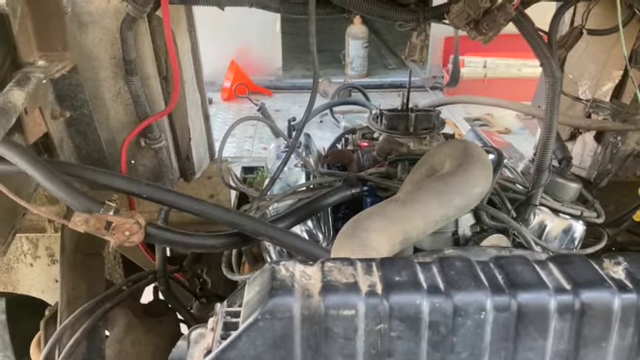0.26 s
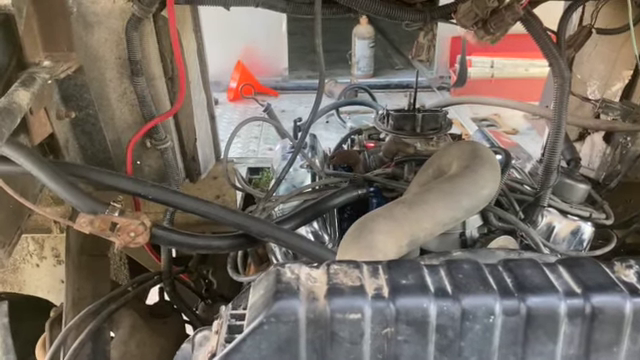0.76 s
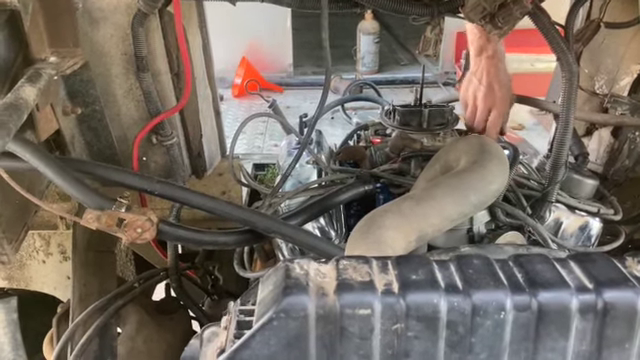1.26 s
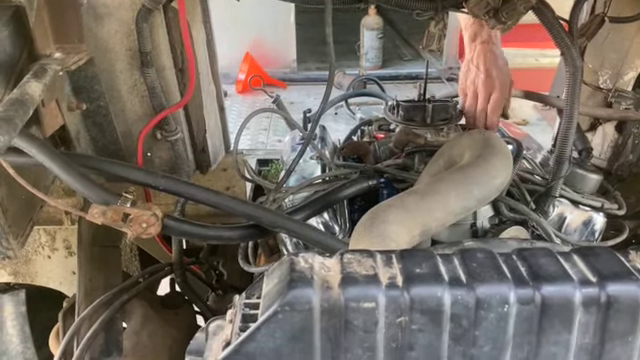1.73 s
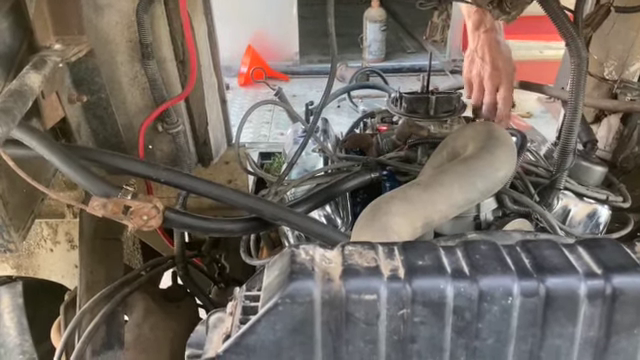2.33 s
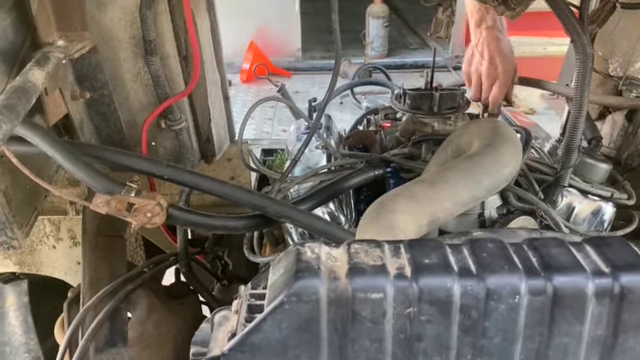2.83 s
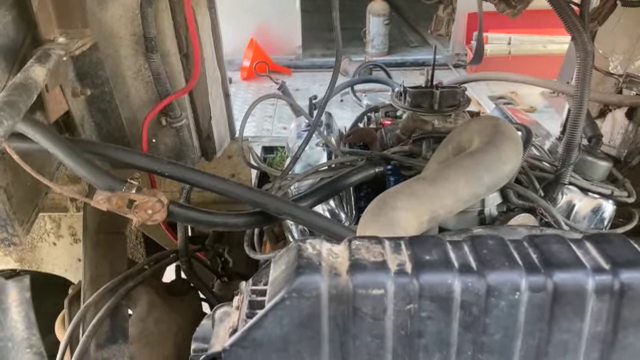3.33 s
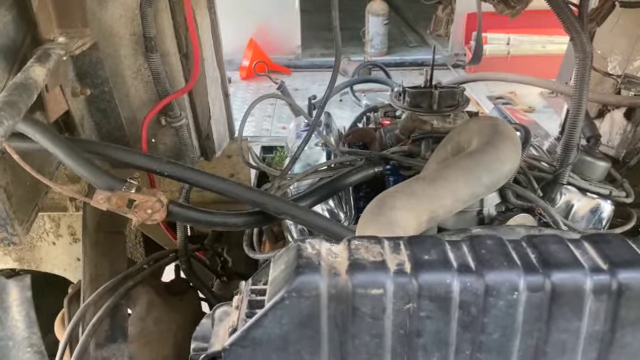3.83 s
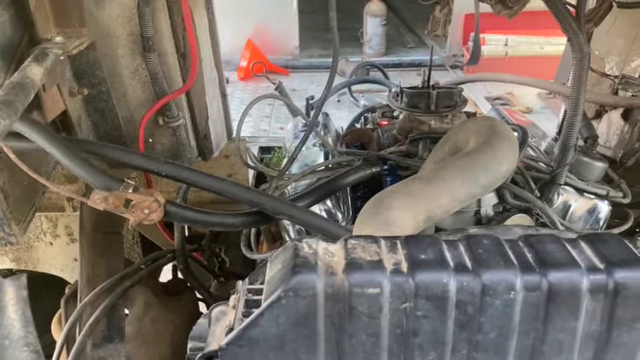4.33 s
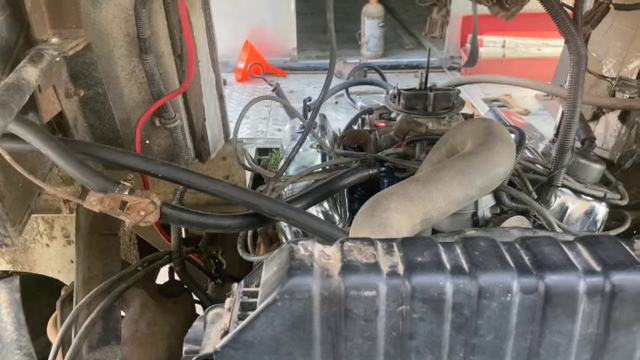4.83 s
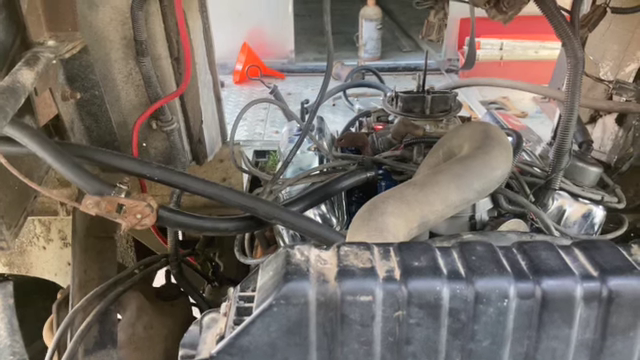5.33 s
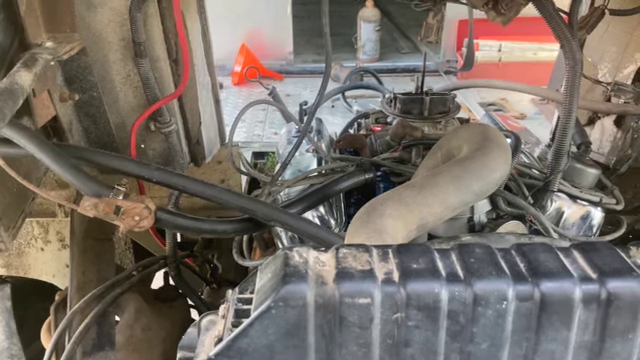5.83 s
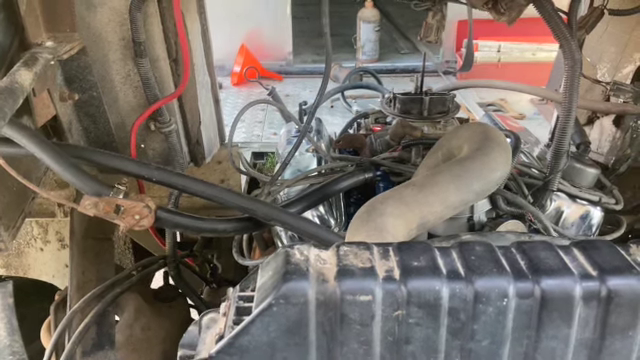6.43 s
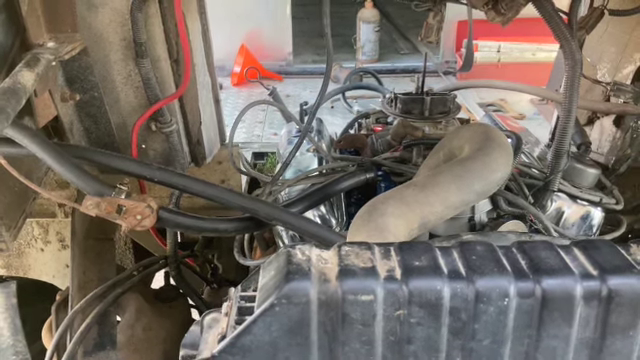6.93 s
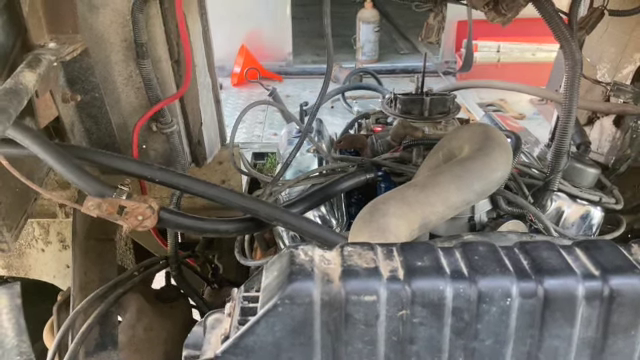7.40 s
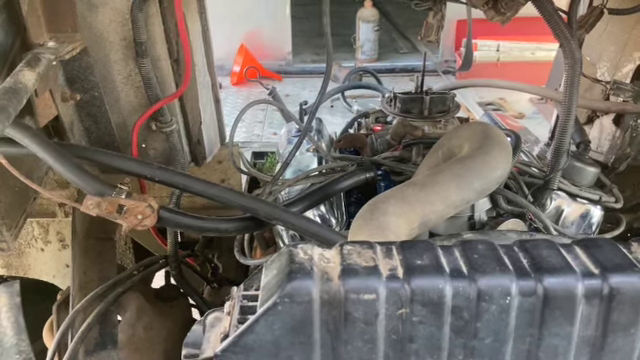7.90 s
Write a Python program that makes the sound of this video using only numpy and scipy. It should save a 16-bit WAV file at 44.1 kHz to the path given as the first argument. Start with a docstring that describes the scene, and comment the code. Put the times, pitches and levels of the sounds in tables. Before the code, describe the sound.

A faint, low, wavering rumble with a trace of hiss lies behind a workshop scene heard close above an open engine bay. Soft dull bumps come at 0.1, 0.65 and 1.1 seconds. A hand then works a metal linkage: light clicks from 1.45, with stronger double snaps and short scraping squeaks near 1.65, 2.35 and 2.93, and soft rubbing between. It is nearly quiet from 3.4. At 4.2 a starter slams in with a hard clack and labours in a gritty, uneven whine, with breathy coughs. At 4.9 the engine catches in a loud surge: boomy, lumpy exhaust, clattering block, droning panels, rushing intake and sharp irregular spits through the carburetor. The spits thin out as it weakens until about 7. At 7.25 it stalls, the firing slows and dulls, and loose ticks rattle unevenly, fading by 8.1. Wide stereo, short metallic echoes.

```python
"""An old carburetted engine heard from just above its open bay, in a workshop: firing pulses drive exhaust,
block and intake, through cranking, a lumpy run and a stall, while noise bursts spit through the carburettor.
Before that a hand bumps, clicks and scrapes at the linkage, as short bursts of filtered noise.
The starter slams in and whines in partials of its tooth pitch; something loose ticks as the engine runs down.
A low rumble lies behind; bay and hall echoes surround it all, picked up by a two-port microphone."""
import sys
import numpy as np
from scipy import signal
from scipy.fft import rfft, irfft
from scipy.io import wavfile
from scipy.ndimage import uniform_filter1d, map_coordinates

SR = 44100
rng = np.random.default_rng(int(sys.argv[2]) if len(sys.argv) > 2 else 0)


def master_out(mix):
    """Clip the mix to full scale and print it as 16-bit PCM to the path in sys.argv[1]."""
    frames = np.transpose(np.atleast_2d(mix))
    ceiling = np.clip(frames, -1, 1)
    pcm = np.round(ceiling * 32767).astype(np.int16)
    wavfile.write(sys.argv[1], SR, pcm)


N = 359856
TIME = np.arange(N) / SR  # s
HZ = np.fft.rfftfreq(2 * N, 1 / SR)

# Stages of the run [s]: the starter engages, the engine has caught, the fire goes out
CRANK_S, CATCH_S, STALL_S = 4.22, 4.92, 7.24
CRANKING_S = CATCH_S - CRANK_S
# Table levels stand ahead of the echoes and the microphone; colours and modes are relative.


def amp(db):
    """Decibels to gain."""
    return 10 ** (np.asarray(db) / 20)


def unit(x):
    """Scale to rms 1."""
    return x / np.sqrt(np.mean(x ** 2))


def curves(rows):
    """Each column of a table as a line through time."""
    s, *columns = np.transpose(rows)
    return [np.interp(TIME, s, c) for c in columns]


def since(s):
    """Seconds gone by since s; zero before."""
    return np.maximum(TIME - s, 0)


def ramp(s, length):
    """Rise from 0 to 1 over length seconds, starting at s."""
    return np.minimum(since(s) / length, 1)


def smooth(x, size):
    """Running mean, taken twice."""
    return uniform_filter1d(uniform_filter1d(x, size), size)


def walk(rate):
    """Smooth chance with a spread near 1, redrawn at this rate [Hz]."""
    k = int(SR / rate)
    return 1.3 * smooth(np.repeat(rng.standard_normal(N // k + 1), k), k)[:N]


def steady(x, seconds):
    """Hold the slow level at 1 and keep the quick pulsing."""
    power = np.abs(smooth(x ** 2, int(seconds * SR)))
    return x / np.sqrt(power + 1e-6)


def body(x, colour, modes=()):
    """Causal filter: a broad (Hz, dB) colour carrying (Hz, width Hz, dB) resonances; rms 1."""
    size = 16384
    bins = np.fft.rfftfreq(size, 1 / SR)
    hz, db = np.transpose(colour)
    # Folding the cepstrum gives minimum phase: no sound ahead of the blow
    cepstrum = irfft(np.log(amp(np.interp(np.log(bins + 1), np.log(hz), db))))
    response = np.exp(rfft(2 * cepstrum[:size // 2], size))
    ring = 1 + sum(amp(d) * 1j * bins * w / (f * f - bins * bins + 1j * bins * w) for f, w, d in modes)
    return unit(signal.oaconvolve(x, irfft(response * ring)[None], axes=-1)[:, :N])


def grit(spread_db):
    """Dense tiny impacts of unequal size, as both ports hear them: alike in the bass, apart in the treble."""
    sizes = amp(spread_db * np.minimum(rng.exponential(size=N), 5))
    mid, side = rng.standard_normal((2, N)) * sizes
    apart = signal.butter(1, 1290, "high", fs=SR, output="sos")  # Hz
    side = signal.sosfilt(apart, side)
    return unit(mid + 0.65 * side * np.array([[1], [-1]]))


def mottle(x, patchy_db, width_hz, seconds):
    """Let resonances come and go by chance, so that the colour keeps shifting."""
    hz, s, cells = signal.stft(x, SR, nperseg=512)
    chance = rng.standard_normal((300, 600))
    grid = np.meshgrid(hz / width_hz, s / seconds, indexing="ij")
    field = map_coordinates(chance, grid, order=1, mode="wrap")
    return unit(signal.istft(cells * amp(patchy_db * field), SR)[1][:, :N])


def swells(rows, hold):
    """Envelope of (s, dB, lead-in s, fade s) events that swell, hold for a moment and fade."""
    power = np.zeros(N)
    for s, db, lead, fade in rows:
        before = np.maximum(s - TIME, 0) / lead
        after = np.maximum(TIME - s - hold, 0) / fade
        power += amp(db) ** 2 * np.exp(-2 * np.minimum(before + after, 20))
    return np.sqrt(power)


def rasp(envelope, grain, colour, modes=()):
    """A grain that follows an envelope and rings one body."""
    return body(grain * envelope, colour, modes) * np.sqrt(np.mean(envelope ** 2))


def ringing(rows, lead, fade, hold, width_hz):
    """Brief, rough resonances of (s, dB, pitch Hz), each at a slightly wavering pitch of its own."""
    rows = sorted(rows)
    starts, _, pitches = np.transpose(rows)
    hz = pitches[np.searchsorted(starts[1:] - lead, TIME)]
    turn = 2 * np.pi * np.cumsum(hz * np.exp(.02 * walk(40))) / SR
    roughness = body(grit(0.33), [(width_hz, 0), (4 * width_hz, -24), (5000, -70)])
    return swells([(s, db, lead, fade) for s, db, _ in rows], hold) * roughness * np.sin(turn)


def workshop(x, bay_t60, hall_t60, bay_db, hall_db, scatter_hz):
    """Dense echoes off the bay's panels and a faint hall, even in colour; long waves are scattered little."""
    tails = 0
    for t60, db in [(bay_t60, bay_db), (hall_t60, hall_db)]:
        decay = amp(db - 60 * TIME / t60) * np.sqrt(2 * np.log(1000) / (t60 * SR))
        tails = tails + decay * rng.standard_normal((2, N))
    response = 1 + HZ / np.hypot(HZ, scatter_hz) * rfft(tails, 2 * N)
    tint = np.sqrt(smooth(np.abs(response) ** 2, 8000))
    return irfft(rfft(x, 2 * N) * response / tint)[:, :N]


def ambience():
    """A low, slowly wavering rumble with a trace of hiss; it swells over the first moments."""
    # Colour of the room at rest: (frequency [Hz], level [dB])
    shop_colour = [(20, -38), (45, -7.5), (80, 3), (140, -9.5), (225, -10.5), (340, -22), (650, -26),
                   (1200, -34), (1950, -27.5), (3000, -38), (9000, -45.5), (15500, -38.5)]
    rumble = body(grit(0.4), shop_colour, [(660, 36, 5.4)]) * amp(walk(5.7))
    return rumble * amp(-70.25 + 6.5 * ramp(0, 1.37))  # dB, swell over 1.37 s


def loose_part():
    """Once the fire is out something loose ticks unevenly and rustles, weakening overall."""
    # Ticks: (time [s], level before trim [dB])
    tick_rows = [(7.3158, -45), (7.3846, -60), (7.432, -42.5), (7.474, -44), (7.5063, -50), (7.579, -46),
                 (7.6555, -47), (7.7236, -47.5), (7.782, -47.5), (7.834, -52.5), (7.885, -51),
                 (7.9319, -56), (7.9758, -56), (8.0152, -54), (8.0576, -55), (8.1244, -58.5)]
    # Colour of the part: (frequency [Hz], level [dB])
    tick_colour = [(600, -5), (1100, 4.5), (1450, 13), (1800, 8.5), (2300, -2.5), (3400, -7), (5000, -29),
                   (12000, -23.5)]
    tick_trim_db, rustle_trim_db, rustle_s = -0.5, -15.5, 0.064
    ticks = [(s, db + tick_trim_db, 0.001, 0.0075) for s, db in tick_rows]
    # The part keeps shivering between its ticks
    rustle = [(s, db + rustle_trim_db, rustle_s, rustle_s) for s, db in tick_rows]
    return rasp(swells(ticks + rustle, hold=0.0015), grit(3.2), tick_colour)


def handling():
    """Soft bumps, then scrapes and snaps of the linkage, with fingers rubbing in between."""
    # Dull bumps: (time [s], level before trim [dB], lead-in [s])
    bump_rows = [(0.057, -37.5, 0.0014), (0.087, -42.5, 0.03), (0.6523, -41, 0.00056), (1.088, -47, 0.0062),
                 (1.11, -44.5, 0.0053), (1.322, -53.5, 0.018)]
    # Linkage clicks: (time [s], level before trim [dB], lead-in [s],
    # hard snap before trim [dB], ring of the casting [dB])
    click_rows = [(1.447, -30.5, 0.00044, -31, -61), (1.621, -35.5, 0.0011, -53, -62),
                  (1.644, -20.5, 0.0034, -21.5, -42.5), (1.669, -25.5, .0023, -26.5, -42),
                  (2.124, -34.5, .0005, -30.5, -58), (2.251, -54, 0.00055, -43.5, -70),
                  (2.302, -44, .0023, -45.5, -55), (2.348, -24, .001, -20.5, -41.5),
                  (2.588, -46.5, .0004, -71, -54.5), (2.729, -34, .00034, -32, -68),
                  (2.914, -32.5, .001, -38, -57), (2.928, -18.5, 0.0031, -16.5, -38.5),
                  (2.955, -27, .0044, -28.5, -39.5), (3.407, -57, .0019, -78, -73)]
    # Squeaks as the lever slides: (time [s], level [dB], pitch [Hz])
    scrape_rows = [(1.619, -48, 1910), (1.646, -34.5, 1316), (2.308, -51, 2085), (2.334, -46, 1450),
                   (2.912, -44, 2246), (2.922, -34.5, 1366)]
    # Soft rubbing and movement: (time [s], level [dB], lead-in [s], fade [s])
    rub_rows = [(1.2, -69.5, .06, 0.12), (1.42, -61, 0.037, 0.033), (1.68, -55.5, 0.091, .1),
                (2.17, -66.5, 0.08, 0.05), (2.36, -54, 0.063, 0.06), (2.69, -60.5, 0.077, 0.11),
                (2.95, -52.5, 0.049, 0.078), (3.81, -70.5, 0.0089, 0.035), (4.11, -66.5, 0.074, .05)]
    # Colours of bump, click, snap and rub: (frequency [Hz], level [dB])
    bump_colour = [(60, -16), (110, -2), (170, 2), (330, -8.5), (620, 2), (1200, -15.5), (3200, -21),
                   (4000, -35), (8300, -44), (11000, -59)]
    click_colour = [(120, -4), (250, -1), (420, -13.5), (1000, 2), (1500, 5), (2800, -2), (4300, 4),
                    (6000, -8), (8000, 1.5), (11300, 0.5), (15500, -20)]
    snap_colour = [(300, -19.5), (1400, -14), (5500, -7.5), (8200, 2), (15000, -6)]
    rub_colour = [(100, -11), (230, 13), (380, -9), (650, -8.5), (950, -2.5), (2000, -7.5), (3000, -14),
                  (8000, -16.5), (15000, -30.5)]
    # Resonances of linkage and casting: (frequency [Hz], width [Hz], level [dB])
    click_modes = [(1320, 61, 2), (2065, 100, 3)]
    casting_modes = [(530, 17, 9), (642, 48, 16)]

    bump_shape = swells([(s, db, lead, 0.014) for s, db, lead in bump_rows], hold=0.0033)
    bumps = rasp(bump_shape, grit(1.0), bump_colour)

    friction = mottle(grit(1.88), patchy_db=3.0, width_hz=320, seconds=0.1)
    click_shape = swells([(s, db, lead, 0.018) for s, db, lead, *_ in click_rows], hold=0.0039)
    clicks = rasp(click_shape, friction, click_colour, click_modes)
    snap_shape = swells([(s, db, .001, .002) for s, _, _, db, _ in click_rows], hold=0.0012)
    snaps = rasp(snap_shape, grit(0.83), snap_colour)

    casting_colour = [(60, -8), (200, -4.5), (700, 4.5), (1800, -28.5)]
    casting = steady(body(grit(.5), casting_colour, casting_modes), seconds=.02)
    casting = casting * swells([(s, db, lead, .024) for s, _, lead, _, db in click_rows], hold=0.0045)

    scrapes = ringing(scrape_rows, lead=.003, fade=0.014, hold=0.0075, width_hz=97)
    rub_shape = swells(rub_rows, hold=0.014) * amp(1.8 * walk(29.53))
    rub = rasp(rub_shape, friction, rub_colour, casting_modes)
    return amp(-4.5) * bumps + amp(-11.5) * clicks + amp(-3.5) * snaps + casting + scrapes + rub


def starter():
    """The solenoid snaps, the pinion slams home and its teeth whine, sagging at each compression."""
    # Labouring whine: (time [s], mesh pitch [Hz], second partial [dB], upper partials [dB])
    starter_rows = [(4.24, 270, -25.5, -36), (4.285, 288.2, -40, -45), (4.325, 319.5, -30.5, -27.5),
                    (4.39, 315.3, -31, -34.5), (4.47, 294, -32, -33), (4.52, 322.4, -23.5, -25),
                    (4.565, 282, -30, -32.5), (4.6, 278.5, -33, -39), (4.68, 315, -37, -28.5),
                    (4.712, 311, -38, -35.5), (4.76, 308.5, -42, -21), (4.8, 270, -29.5, -35),
                    (4.85, 258.7, -49.5, -48.5)]
    # Upper partials of the whine: (multiple of mesh pitch [-], level [dB])
    mesh_partials = [(3, 0), (4, -8), (5, -10), (7, -15.5), (8, -15)]
    # Solenoid snaps, pinion into ring gear: (time [s], level [dB], lead-in [s], fade [s])
    slam_rows = [(4.1725, -10, 0.00014, 0.0032), (4.198, -8.5, 0.0074, 0.013), (4.209, -10, 0.0034, 0.005)]
    # Colour of the slam: (frequency [Hz], level [dB])
    slam_colour = [(70, -35), (130, -8.5), (300, -4), (500, 3.5), (900, -6), (1500, 0), (2100, 0),
                   (2700, -9), (3500, -7.5), (5500, -8), (8200, -9.5), (12000, -17.5), (15800, -25)]
    # Ring of the solenoid: (time [s], level [dB], pitch [Hz])
    solenoid_ring = (4.173, -9, 3400)
    pinion_teeth, wobble_db = 9, 2.5
    release_s, release_db_s = 4.83, 196  # the pinion drops out
    spin_up_s = 0.016

    hz, low_db, high_db = curves(starter_rows)
    turn = 2 * np.pi * np.cumsum(hz * (1 + .009 * walk(170))) / SR
    upper = unit(sum(amp(d + 2.5 * walk(40)) * np.sin(k * turn) for k, d in mesh_partials))
    whine = amp(low_db) * unit(np.sin(2 * turn)) + amp(high_db) * upper
    # The teeth bite unevenly, in step with each pinion turn and by chance
    whine = whine * amp(wobble_db * (np.sin(turn / pinion_teeth) + walk(60)))
    whine = whine * amp(-release_db_s * since(release_s)) * ramp(CRANK_S, spin_up_s)
    slam = rasp(swells(slam_rows, hold=0.0013), grit(0.42), slam_colour)
    ping = ringing([solenoid_ring], lead=0.00027, fade=0.0028, hold=0.00074, width_hz=84)
    return whine + slam + ping


def misfires():
    """The carburettor coughs, then spits back; each spit rings its throat at a pitch of its own."""
    # First coughs of mixture while cranking: (time [s], level [dB])
    cough_rows = [(4.65, -21.5), (4.736, -24.5), (4.838, -22)]
    # Spits through the carburettor: (time before lag [s], level before trim [dB],
    # throat pitch [Hz], throat ring [dB], extra treble [dB])
    spit_rows = [(4.942, -10, 2500, -16.5, -4), (5.031, -8, 2636, -20, 0), (5.0729, -8, 2500, -29, 0),
                 (5.1467, -5, 2694, -20, 0.5), (5.222, -17, 2310, -25.5, -10),
                 (5.2444, -25.5, 2530, -38, 6.5), (5.288, -15.5, 2977, -32, -15),
                 (5.322, -10.5, 2605, -22, -3.5), (5.3627, -15, 2615, -30, -5),
                 (5.433, -8.5, 2540, -35, -3.5), (5.502, -20.5, 2304, -29, 1.5), (5.579, -21, 2412, -34, 3),
                 (5.6211, -20.5, 2765, -27, 5.5), (5.67, -15.5, 2280, -43, 1), (5.727, -19, 4390, -32, -2),
                 (5.767, -7.5, 2760, -24, -4), (5.812, -22.5, 2008, -22.5, -1.5),
                 (5.853, -15, 2500, -21.5, -2.5), (5.9434, -19.5, 2385, -19, -1),
                 (5.996, -9, 2830, -40, -3), (6.0551, -15.5, 2350, -24.5, -1),
                 (6.1205, -21, 4470, -35, -6.5), (6.173, -12, 2700, -16.5, 3),
                 (6.2244, -25, 2012, -31, 0.5), (6.2695, -12.5, 2282, -24, -6),
                 (6.3914, -29, 3040, -36.5, 3.5), (6.459, -13, 2483, -24, -1),
                 (6.551, -12.5, 2600, -42, -1.5), (6.7733, -12.5, 2500, -23, -3),
                 (6.8394, -20.5, 2410, -40, -2.5), (6.9032, -21, 2226, -29, 3),
                 (6.9885, -17, 2524, -26.5, -1.5)]
    # Colour of the jet: (frequency [Hz], level [dB])
    spit_colour = [(500, -14.5), (1500, -2.5), (2500, 1), (3500, 0.5), (4400, 2.5), (6500, -0.5),
                   (8500, 0.5), (12000, 0.5), (15500, -3.5)]
    lead, fade = 0.0054, 0.012  # s
    gas = mottle(grit(4.2), patchy_db=2.5, width_hz=702, seconds=0.02)

    cough_shape = swells([(s, db, .019, 0.033) for s, db in cough_rows], hold=0.0051)
    cough_colour = [(900, -22.5), (2400, 4.5), (4300, -0.5), (6500, -12.0), (8500, -13.5), (15000, -26.0)]
    coughs = rasp(cough_shape, gas, cough_colour)

    blast = swells([(s + 0.0028, db, lead, fade) for s, db, *_ in spit_rows], hold=0.0053)
    sizzle_rows = [(s + 0.0013, db + bright, lead, fade) for s, db, _, _, bright in spit_rows]
    sizzle = swells(sizzle_rows, hold=0.0019)
    jet = body(gas, spit_colour)
    low = signal.sosfiltfilt(signal.butter(2, 5490, fs=SR, output="sos"), jet)  # the sizzle lies above
    spits = amp(-4.5) * (blast * low + sizzle * (jet - low))

    throat_rows = [(s + 0.002, ring, hz) for s, _, hz, ring, _ in spit_rows]
    throat = ringing(throat_rows, lead=0.0026, fade=0.012, hold=0.0082, width_hz=125)
    return coughs + spits + throat


def flare():
    """The surge on catching: 1 until then, soon spent."""
    return np.exp(-(since(CATCH_S) / .3) ** 2)


def stages(first_db, last_db, firing_db, flare_db, starve_db_s, out_s, drop_db, coast_db_s):
    """Gain that builds while cranking, flares on catching, sinks as fuel runs short and drops as the engine dies."""
    rise_s, die_s = 0.13, 0.29
    cranking = first_db + (last_db - first_db) * ramp(CRANK_S, CRANKING_S)
    firing = firing_db + flare_db * flare() - starve_db_s * (since(CATCH_S) - since(out_s))
    caught = ramp(CATCH_S - rise_s, rise_s)
    dying = drop_db * ramp(out_s, die_s) + coast_db_s * since(out_s)
    return amp(cranking + caught * (firing - cranking) - dying)


def speed():
    """Firings a second: the crank gathers pace, overshoots, holds and coasts down."""
    crank_hz, running_hz, flare_hz = 26.87, 55.2, 6
    coast_hz_per_s = 23
    gain_hz = running_hz + flare_hz * flare() - crank_hz
    return crank_hz + ramp(CRANK_S, CRANKING_S) * gain_hz - coast_hz_per_s * since(STALL_S)


def firings(jitter, scatter_db):
    """Uneven cylinder pulses, and the share of each firing period gone by."""
    # Strength in firing order, one column: (level [dB])
    cylinder_db = [-4.5, -5, -3, -7.5, -2.5, -14, -6, -2.5]
    count = np.cumsum(speed() * np.exp(jitter * walk(70))) / SR
    at = np.flatnonzero(np.diff(np.floor(count)))
    pulses = np.zeros(N)
    pulses[at] = amp(np.resize(cylinder_db, len(at)) + scatter_db * rng.standard_normal(len(at)))
    return pulses, count % 1


def tappets(pulses):
    """The valve gear gives a small hard tick with each firing."""
    # Colour of the ticks: (frequency [Hz], level [dB])
    tappet_colour = [(900, -23.5), (2000, -3), (3200, -4), (4800, -5.5), (7000, -4), (15000, -14.5)]
    # Resonances of the valve gear: (frequency [Hz], width [Hz], level [dB])
    tappet_modes = [(2530, 59, 6.97), (3347, 63, 13)]
    fade_s = 0.0023
    envelope = signal.lfilter([1], [1, -np.exp(-1 / (fade_s * SR))], pulses + 1e-9)
    return body(grit(2.3) * envelope, tappet_colour, tappet_modes) * amp(-6)


def exhaust(gas):
    """Pulses of gas boom and bark in the pipe, whose own note joins the boom as they weaken."""
    # Exhaust: (time [s], boom before trim [dB], bark before trim [dB])
    exhaust_rows = [(4.24, -32, -29), (4.36, -32, -40), (4.45, -35.5, -33), (4.88, -35.5, -43),
                    (4.98, -18, -29.5), (5.2, -25.5, -30.5), (5.31, -21.5, -30), (5.59, -28.5, -34.5),
                    (5.65, -22, -32.5), (5.93, -27, -33), (6.08, -20.5, -28), (6.81, -22, -29.5),
                    (6.91, -27.5, -29), (6.96, -19, -32.5), (7.35, -23, -29), (7.46, -29, -39.5),
                    (7.53, -28, -41.5), (7.78, -39.5, -52), (8.15, -51, -58.5)]
    # Colours of boom and bark: (frequency [Hz], level [dB])
    boom_colour = [(18, -38.5), (35, -9.5), (50, -19.5), (70, -4), (110, -7), (145, -3.5), (180, -10),
                   (300, -26.5), (900, -70.5), (4000, -110)]
    bark_colour = [(60, -22.5), (130, -8.5), (200, 6.5), (245, 0.5), (290, -2.5), (340, -7), (400, -6),
                   (470, -15.5), (650, -17), (950, -33.5), (3000, -58), (9000, -100)]
    # Resonances of the pipe: (frequency [Hz], width [Hz], level [dB])
    pipe_modes = [(76.5, 13, -1), (99, 23, -4.5), (131.4, 5.5, 4)]
    boom_trim_db, bark_trim_db = 0.03, 0.9
    lump_db, lump_hz = 3, 18  # the exhaust chugs unevenly

    boom_db, bark_db = curves(exhaust_rows)
    hz, width, _ = pipe_modes[-1]
    note = unit(signal.lfilter(*signal.iirpeak(hz, hz / width, fs=SR), gas))
    boom = body(gas, boom_colour, pipe_modes) + amp(-7) * ramp(6.71, 0.3) * note
    boom = steady(boom, seconds=.1) * amp(boom_trim_db + boom_db)
    bark = steady(body(gas, bark_colour), seconds=.057) * amp(bark_trim_db + bark_db)
    return (boom + bark) * amp(lump_db * walk(lump_hz))


def soften(x):
    """As the engine dies, the clatter loses its hard edge."""
    dull = signal.sosfiltfilt(signal.butter(1, 2150, fs=SR, output="sos"), x)
    return dull + (x - dull) * amp(-53.5 * ramp(7.265, 0.093))


def block(shake):
    """The shaken block clatters, its panels drone at wavering pitches, and heavy knocks ring out."""
    # Heavy knocks: (time [s], level [dB], lead-in [s], ring [dB], ring pitch [Hz])
    knock_rows = [(4.685, -24.5, .03, -19, 522), (4.955, -16, .01, -34, 640.4),
                  (5.1, -19.5, 0.11, -20, 991), (5.23, -31, 0.0046, -22, 660),
                  (5.675, -24.5, .003, -25, 608), (6.27, -31.5, 0.08, -33, 620),
                  (6.93, -31, 0.039, -39, 562.3)]
    # Clatter through the stages: (first turn [dB], last turn [dB], firing [dB], flare [dB],
    # starving [dB/s], gives out [s], drop [dB], coasting [dB/s])
    clatter_level = (-33.5, -23.5, -26, -1.5, 8, 7.5, 17, 1)
    # Colour of the block: (frequency [Hz], level [dB])
    block_colour = [(150, -6.5), (350, -5.5), (650, 4), (800, -3), (1100, -4), (1600, -3.5), (2600, -7),
                    (3300, -12.5), (6000, -16), (15000, -34.5)]
    # Resonances of block, covers and fan shroud, then low panels: (frequency [Hz], width [Hz], level [dB])
    block_modes = [(914, 48, 3), (1040, 36, 0.5), (1402, 46, 1), (1610, 10, 3.5), (2162, 36, 4.5),
                   (4340, 100, 6)]
    drone_modes = [(396, 17, 27), (527, 13.8, 30.5), (660, 15, 28.5)]
    knock_fade_s = 0.016

    knocks = swells([(s, db, lead, knock_fade_s) for s, db, lead, *_ in knock_rows], hold=.008)
    ring_rows = [(s, db, hz) for s, _, _, db, hz in knock_rows]
    rings = ringing(ring_rows, lead=0.0037, fade=knock_fade_s, hold=.008, width_hz=52)
    level = stages(*clatter_level)
    clatter = steady(body(shake, block_colour, block_modes), seconds=0.02) * np.hypot(level, knocks)

    # Reading the panels at an uneven pace makes their pitch waver
    place = np.arange(N) + np.cumsum(.016 * walk(10))
    panels = body(shake, [(200, -20), (380, 0), (700, 0), (1500, -32)], drone_modes)
    wavering = np.array([map_coordinates(p, [place], order=1, mode="mirror") for p in panels])
    drone = steady(wavering, seconds=0.054) * level * ramp(CRANK_S, CRANKING_S)
    drone = drone * amp(-3 - 9 * since(6.24))  # fades as the engine weakens
    return soften(clatter) + rings + drone


def engine():
    """Firings thud in the exhaust, shake the block and gulp air through the carburettor."""
    # Intake air through the stages: (first turn [dB], last turn [dB], firing [dB], flare [dB],
    # starving [dB/s], gives out [s], drop [dB], coasting [dB/s])
    air_level = (-54, -36.5, -26.5, 5.5, 10, 7, 14.5, 14)
    # Colour of the rushing air: (frequency [Hz], level [dB])
    air_colour = [(900, -11), (1700, -0.5), (2500, -2.5), (3600, -9), (4500, -14.5), (6500, -1),
                  (8500, -0.5), (12000, -6.5), (15500, -11)]
    pulses, phase = firings(jitter=.035, scatter_db=2.5)
    stroke = np.exp(-phase / .5)  # dies away through each firing period
    gas = unit(pulses) + amp(6.0) * unit((0.46 + stroke) * grit(.85))
    rattle = mottle(grit(4.77), patchy_db=4.0, width_hz=191.3, seconds=.03)
    rush = mottle(grit(4.6), patchy_db=3.5, width_hz=356, seconds=.034)
    intake = amp(-1.5) * body(rush * (.45 + stroke), air_colour)
    air = (intake + tappets(pulses)) * stages(*air_level)
    turning = ramp(CRANK_S - .02, .03)
    return turning * (exhaust(gas) + block(rattle * (0.66 + stroke)) + air)


def scene():
    """Everything sounds in the engine bay, each part by its own path."""
    parts = [ambience() + handling(), loose_part() + starter(), misfires(), engine()]
    return sum(workshop(x, bay_t60=0.067, hall_t60=0.41, bay_db=5, hall_db=-14.0, scatter_hz=1854)
               for x in parts)


def record(dry):
    """In the treble each microphone channel subtracts the other port, delayed; peaks are rounded, the top is cut."""
    ports = rfft(dry, 2 * N)
    port_lag_s = .000306  # time sound takes across the port spacing
    cross = np.interp(HZ, [6000, 7800], [0, .97])
    other = np.exp(-2j * np.pi * HZ * port_lag_s) * ports[::-1]
    wide = (ports - cross * other) / np.hypot(1, cross)
    rounded = np.tanh(irfft(wide)[:, :N])
    top_cut = signal.ellip(10, .2, 80, 15850, fs=SR, output="sos")  # Hz
    return signal.sosfilt(top_cut, rounded)


dry = scene()
out = record(dry)
master_out(out)
```